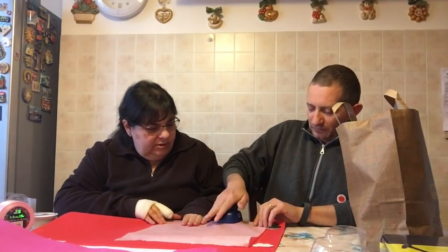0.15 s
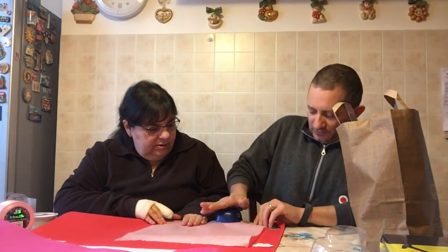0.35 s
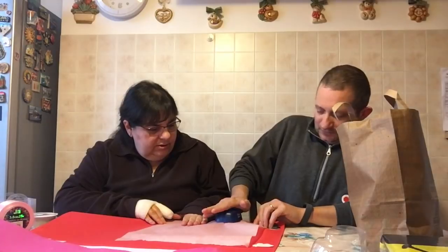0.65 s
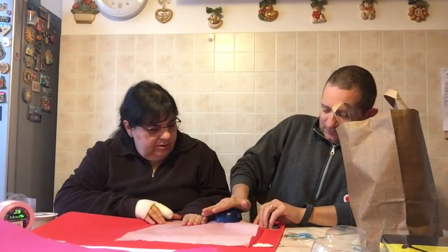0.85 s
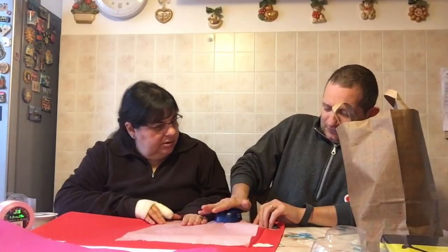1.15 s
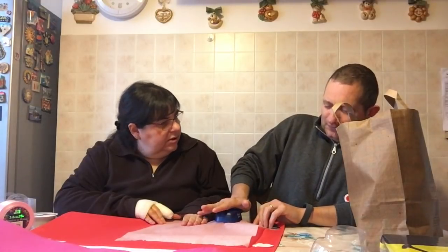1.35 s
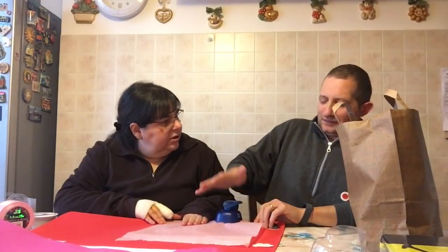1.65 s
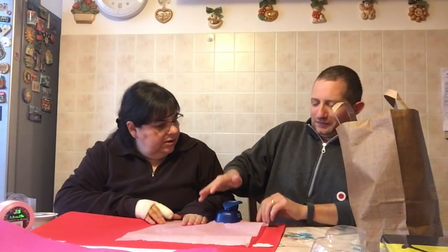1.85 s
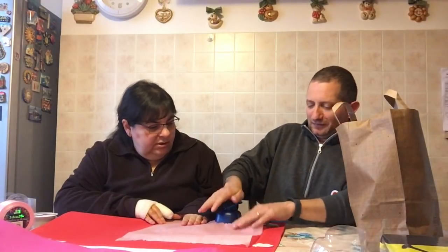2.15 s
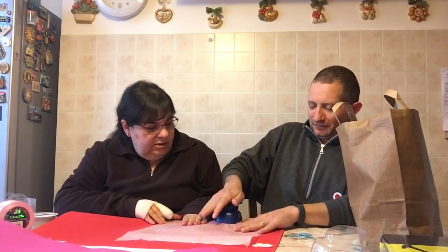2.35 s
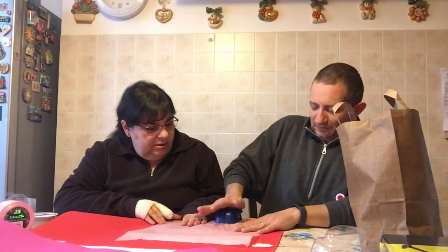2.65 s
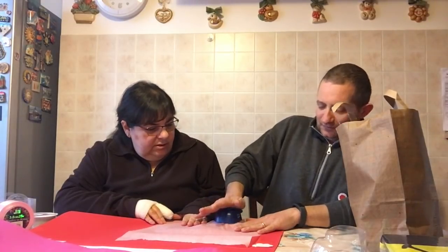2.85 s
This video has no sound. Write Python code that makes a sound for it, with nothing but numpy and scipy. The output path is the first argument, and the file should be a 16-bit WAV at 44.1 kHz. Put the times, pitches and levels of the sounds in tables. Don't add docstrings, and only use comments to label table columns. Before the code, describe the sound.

A plastic paper punch is pressed and released on a paper-covered table: small clicks and creaks, a clack with a knock, a quieter one, then a much louder hard clunk, in a small tiled kitchen, small microphone.

```python
import sys
import numpy as np
from scipy import signal
from scipy.fft import rfft, irfft
from scipy.io import wavfile
from scipy.ndimage import uniform_filter1d

SR = 44100
rng = np.random.default_rng(int(sys.argv[2]) if len(sys.argv) > 2 else 0)


def ratio_of_db(decibels):
    return 10 ** (np.asarray(decibels, float) / 20)


def wrap_up_sound(samples):
    columns = np.atleast_2d(samples).T
    tamed = np.clip(columns, -1, 1)
    steps = np.round(tamed * 32767).astype(np.int16)
    wavfile.write(sys.argv[1], SR, steps)


N = 132300


def unit(x):
    return x / np.sqrt(np.mean(x ** 2))


def read(table, hz, axis=1):
    table = np.array(table)
    return np.interp(np.log(hz + 1), np.log(table[:, 0]), table[:, axis])


def colour(x, table):
    hz = np.arange(len(x) // 2 + 1) * SR / len(x)
    return irfft(rfft(x) * ratio_of_db(read(table, hz)), len(x))


def ring(x, hz, t60):
    pole = np.exp(2j * np.pi * hz / SR - np.log(1000) / (t60 * SR))
    return signal.lfilter([1], [1, -pole], x).imag


def add(out, s, piece):
    i = int(s * SR)
    out[i:i + len(piece)] += piece[:len(out) - i]


def strokes(rows):
    t = np.arange(N) / SR
    fade_s = 0.0019
    power = np.zeros(N)
    for s, up, hold, db in rows:
        swell = np.clip((t - s) / up, 0, 1) ** 2
        fade = np.exp(-np.maximum(t - s - up - hold, 0) / fade_s)
        power += (ratio_of_db(db) * swell * fade) ** 2
    return np.sqrt(power)


def grains(per_s, spread_db):
    chance = rng.random(N)
    size = np.minimum(rng.exponential(size=N), 3)
    flurry = unit(uniform_filter1d(rng.standard_normal(N), size=300))
    strength = ratio_of_db(spread_db * (size + 1.1 * flurry))
    return unit((chance < per_s / SR) * rng.standard_normal(N) * strength)


# (frequency [Hz], level [dB per Hz])
HUM_SPECTRUM = [(15, -51.5), (25, 2), (86, -2), (233, -9), (331, -6), (368, -8), (399, -12), (1020, -16.5),
                (15500, -32.5)]


def hum():
    waver = uniform_filter1d(rng.standard_normal(N), size=4000)
    waver = unit(uniform_filter1d(waver, size=4000))
    return unit(colour(rng.standard_normal(N), HUM_SPECTRUM)) * ratio_of_db(-61.5 + waver)


# (frequency [Hz], t60 [s], level [dB])
ROOM_DECAY = [(61, 0.57, 4), (246, 0.46, -0.5), (1000, 0.36, -1), (4130, 0.4, -0.5), (12700, 0.26, 1.5)]


def kitchen(x):
    tail_db, rise_s = -5, 0.0068
    t = np.arange(SR) / SR
    spectrum = rfft(rng.standard_normal(SR))
    hz = np.arange(SR // 2 + 1)
    tail = np.zeros(SR)
    for centre in 31.25 * 2. ** np.arange(10):
        band = np.clip(1 - abs(np.log2((hz + 1) / centre)), 0, 1)
        decay_db = read(ROOM_DECAY, centre, axis=2) - 60 * t / read(ROOM_DECAY, centre)
        tail += irfft(spectrum * band, SR) * ratio_of_db(decay_db)
    tail = tail * (1 - np.exp(-t / rise_s))
    reply = ratio_of_db(tail_db) * tail / np.sqrt(np.sum(tail ** 2))
    reply[0] = 1
    return signal.fftconvolve(x, reply)[:N]


# (start [s], swell [s], hold [s], level [dB])
PAPER_STROKES = [(0, 0.0011, 0.11, -70.5), (.09, 0.024, 0.068, -61), (.27, 0.034, 0.038, -59.5),
                 (.324, 0.01, 0.026, -38), (.36, 0.0094, 0.07, -46.5), (.445, 0.011, 0.018, -43),
                 (.49, 0.013, 0.075, -50), (.586, 0.001, 0.063, -38), (.608, 0.002, 0.0144, -32.5),
                 (.74, 0.011, 0.228, -59.5), (1.01, 0.004, 0.031, -59), (1.4, 0.017, 0.056, -65),
                 (1.5, 0.019, 0.098, -65.5), (1.578, 0.0017, 0.044, -51), (1.59, 0.034, 0.057, -48.5),
                 (1.648, 0.0019, 0.044, -38.5), (1.808, 0.00083, 0.019, -47.5), (1.87, 0.01, 0.062, -56),
                 (2.07, 0.018, 0.048, -64.5), (2.206, 0.002, 0.035, -48), (2.24, 0.0096, 0.045, -42),
                 (2.295, 0.005, 0.03, -43), (2.327, .003, .03, -44), (2.48, 0.0098, 0.021, -66.5),
                 (2.615, 0.03, .002, -33), (2.645, 0.0022, 0.025, -31.5)]
# (frequency [Hz], level [dB per Hz])
PAPER_SPECTRUM = [(330, -20), (900, -3), (1200, -3.5), (3500, -5.5), (6000, -5.5), (7750, -8), (12500, -3),
                  (15500, -18)]


def paper():
    friction = grains(14000, 1.5) + 0.5 * rng.standard_normal(N)
    return unit(colour(friction, PAPER_SPECTRUM)) * strokes(PAPER_STROKES)


# (time [s], level [dB], pulse length [ms],
# direction [+1 or -1])
TABLE_BLOWS = [(.318, -46, 2.5, 1), (.342, -34, 3.2, 1), (.42, -44, 6.5, 1), (.5, -42, 3, 1),
               (.512, -44, 3, -1), (.616, -21, 1.8, -1), (.6205, -23, 1.8, 1), (.624, -19, 2.2, -1),
               (.6265, -24, 1.8, -1), (.6278, -18, 2.8, 1), (.645, -19, 3.4, 1), (.666, -26, 6, -1),
               (.679, -27, 7, 1), (.684, -25, 6, -1), (.711, -31, 8, 1), (.752, -36, 4, -1),
               (.78, -36, 5.5, 1), (1.45, -52, 4, 1), (1.66, -36, 5.5, 1), (1.6785, -28, 2.2, 1),
               (1.6803, -21, 2.4, -1), (1.6915, -28, 3, 1), (1.6995, -26, 2.6, -1), (1.702, -25, 1.4, 1),
               (1.7095, -30, 4, 1), (1.7125, -31, 5, -1), (1.752, -33, 4, 1), (2.6485, -12, 1.3, -1),
               (2.6622, -8, 2.8, 1), (2.6672, -11, 1.6, 1), (2.679, -13, 4.2, 1), (2.6835, -14, 3, -1),
               (2.687, -14, 2, 1), (2.703, -18, 3, -1), (2.72, -17, 2.6, -1), (2.87, -36, 5, 1),
               (2.92, -38, 6, -1)]


def blows():
    force = np.zeros(N)
    for s, db, ms, direction in TABLE_BLOWS:
        phase = np.arange(int(SR / 50)) / (SR * ms / 1000)
        add(force, s, ratio_of_db(db) * direction * np.sin(np.pi * np.minimum(phase, 1)) ** 2)
    return ratio_of_db(-3.5) * force


# (frequency [Hz], level [dB], t60 [s])
TABLE_MODES = [(59.3, -17, 0.29), (92, -9, 0.41), (124, -26, 0.3), (163, -14.5, 0.36), (227, -41, 0.54),
               (292.8, -19, 0.64), (342.6, -15.5, 0.76), (401, -7, 0.17), (452.6, -2, 0.16),
               (530.5, -3, 0.42), (716, -2, 0.1), (912, -8, 0.35), (1030, -24, 0.75), (1290, -39, 0.51)]


def table(force):
    ringing = np.zeros(N)
    for hz, db, t60 in TABLE_MODES:
        ringing += ratio_of_db(db) * hz / 20000 * ring(force, hz, t60)
    return ratio_of_db(-9.5) * ringing


# (start [s], swell [s], hold [s], level
# [dB], brightest [Hz])
CREAKS = [(0.31, 0.03, 0.033, -37.5, 745), (0.34, 0.009, 0.0495, -48.5, 1700),
          (0.446, .03, .09, -56.5, 585), (0.606, 0.003, 0.045, -41, 1600),
          (0.729, 0.024, 0.15, -55, 354), (0.921, .03, 0.086, -66, 450),
          (1.416, 0.017, 0.045, -67, 550), (1.575, 0.022, 0.041, -45, 1350),
          (1.649, 0.0046, 0.026, -36, 1600), (1.6, 0.0042, .06, -52.5, 2400),
          (.495, .01, .05, -54, 800), (.408, .004, 0.022, -49.5, 1560),
          (1.589, 0.069, 0.047, -34.5, 333), (1.645, 0.0052, 0.035, -37, 910),
          (0.324, 0.037, 0.066, -48, 295), (0.3137, 0.011, 0.036, -44, 1740),
          (2.244, 0.036, 0.053, -62, 1130), (2.476, 0.0087, 0.037, -62, 2050),
          (2.612, 0.03, 0.004, -35, 1400), (2.644, 0.00092, 0.0258, -21, 1235),
          (2.625, 0.012, 0.025, -32, 400)]


def creaks():
    out = np.zeros(N)
    rub = np.diff(grains(9000, 1.6), prepend=0)
    for *stroke, hz in CREAKS:
        upper = ring(rub, hz, 2.73 / hz)
        both = ring(upper, 0.81 * hz, 1.17 / hz)
        out += unit(both) * strokes([stroke])
    return out


# (time [s], level [dB], centre [Hz], width [Hz])
SHARP_TICKS = [(.3355, -30, 4300, 2000), (.343, -28, 12500, 3000), (.386, -33, 3000, 3000),
               (.4348, -21, 13000, 4400), (.4518, -29, 5900, 1400), (.4518, -31, 13000, 6000),
               (.4522, -34, 2400, 2000), (.4915, -36, 3500, 5000), (.4955, -35, 12500, 4000),
               (.5405, -39, 8000, 12000), (.56, -40, 10000, 8000), (.5862, -26, 9000, 13000),
               (.5885, -30, 12500, 3000), (.5955, -27, 12500, 4000), (.6135, -25, 11500, 7000),
               (1.579, -40, 3500, 6000), (1.6478, -27, 9000, 6000), (1.672, -26, 12000, 4000),
               (1.680, -29, 12000, 7000), (1.8072, -29.5, 10500, 7000), (1.8076, -34, 4000, 3500),
               (1.8148, -36, 12700, 2000), (2.2045, -47, 8000, 8000), (2.2075, -34, 11000, 10000),
               (2.2465, -32, 8000, 7000), (2.254, -33, 12500, 4000), (2.267, -32, 9000, 9000),
               (2.273, -32, 6500, 4000), (2.28, -35, 12500, 3000), (2.3015, -29, 10000, 11000),
               (2.309, -30, 11000, 7000), (2.329, -27, 11500, 6000), (2.329, -34, 5000, 4000),
               (2.6185, -40, 4000, 6000), (2.487, -44, 4000, 5000), (2.6445, -22, 8000, 2500),
               (2.649, -21, 5500, 4000), (2.653, -25, 11000, 7000), (2.668, -27, 8500, 2500)]
# (delay [ms], level [dB])
TILE_RETURNS = [
    (0, 0),
    (4, -1),
    (8.4, -9),
]


def ticks():
    out = np.zeros(N)
    t = np.arange(400) / SR
    decay_ms, bright_hz = 0.35, 7000
    for s, db, hz, width in SHARP_TICKS:
        crackle = (rng.standard_normal(400) + 3 * (t == 0)) * np.exp(-t * 1000 / decay_ms)
        edges = np.clip([hz - width / 2, hz + width / 2], 100, 20000)
        tick = signal.sosfilt(signal.butter(3, edges, "band", fs=SR, output="sos"), crackle)
        tick = tick / abs(tick).max()
        paths = TILE_RETURNS if hz > bright_hz else TILE_RETURNS[:1]
        for late_ms, loss_db in paths:
            add(out, s + late_ms / 1000, ratio_of_db(db + loss_db) * tick)
    return out


# (time [s], level [dB],
# pitch [Hz], t60 [ms])
SNAPS = [(.3345, -42, 925, 18), (.342, -43, 670, 43), (0.351, -24.5, 2030, 8.6),
         (.606, -33, 2710, 4.3), (0.612, -22, 1820, 14), (.613, -22.5, 946, 16),
         (.385, -33.5, 884, 19), (.588, -36, 1050, 10), (.594, -38, 1400, 10), (.62, -27, 946, 21),
         (0.638, -31, 1056, 25), (.652, -30, 950, 27), (1.579, -40, 1790, 12), (1.601, -51, 1670, 21),
         (1.607, -31, 1700, 40), (1.6486, -16.5, 1430, 14.4), (1.6486, -20, 1840, 16),
         (1.652, -25, 800, 20), (1.654, -32, 1860, 12), (1.8146, -39, 1990, 26),
         (1.828, -47, 2060, 42), (1.680, -31, 757, 44), (2.645, -5.5, 710, 11.2),
         (2.648, -7.5, 482, 20), (2.649, -10, 1730, 7.5), (2.65, -14, 2290, 14.3),
         (2.656, -21, 2800, 15), (2.664, -12, 466, 63), (2.665, -16, 716, 37),
         (2.668, -24.5, 2500, 13), (2.687, -15, 710, 10.5), (2.657, -17, 284, 94)]


def snaps():
    out = np.zeros(N)
    t = np.arange(SR // 10) / SR
    for s, db, hz, ms in SNAPS:
        onset = 1 - np.exp(-hz * t * 3)
        add(out, s, ratio_of_db(db - 60000 * t / ms) * np.sin(2 * np.pi * hz * t) * onset)
    return out


def scene():
    thud = blows()
    stays = 0.23
    airborne = ticks() + snaps() + creaks() + (1 - stays) * thud + paper()
    mix = kitchen(airborne) + stays * thud + table(thud) + hum()
    return mix[None]


def band_limit(x):
    return signal.sosfilt(signal.butter(12, 16680, fs=SR, output="sos"), x)


def record(dry):
    low_cut = signal.butter(3, 44, "high", fs=SR, output="sos")
    top_cut = signal.ellip(8, .3, 22, 15700, fs=SR, output="sos")
    mic = signal.sosfiltfilt(low_cut, dry)
    mic = signal.sosfilt(top_cut, mic)
    return band_limit(mic)


dry = scene()
out = record(dry)
wrap_up_sound(out)
```